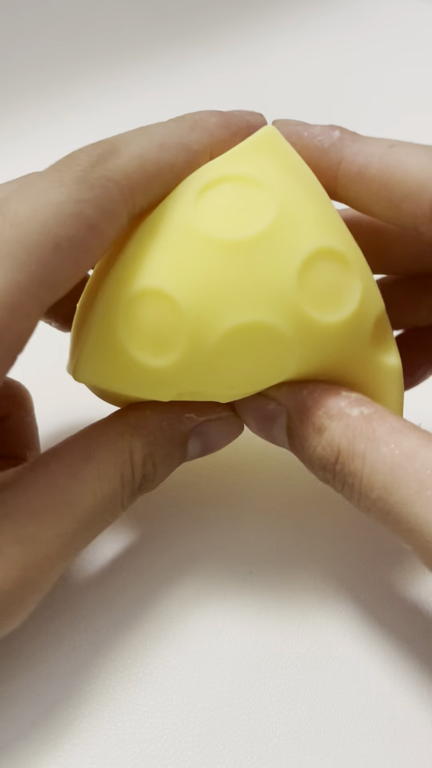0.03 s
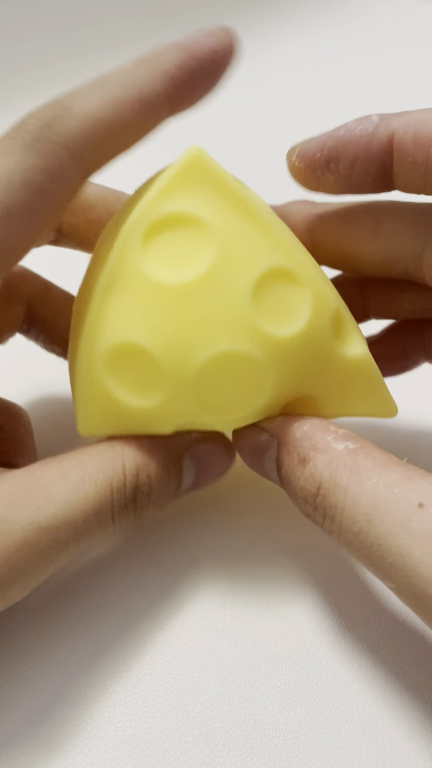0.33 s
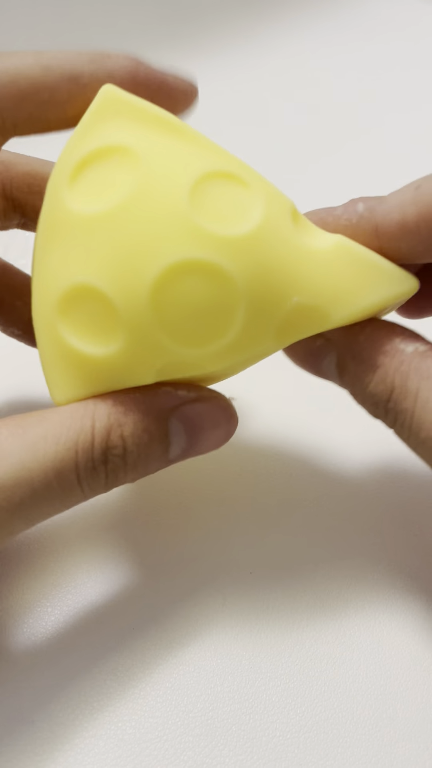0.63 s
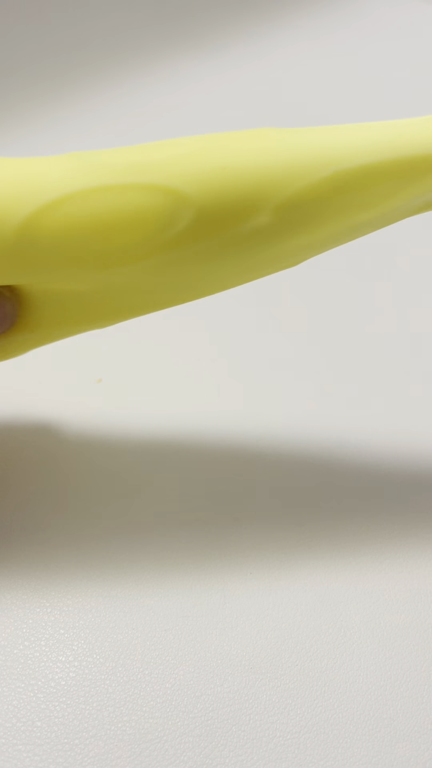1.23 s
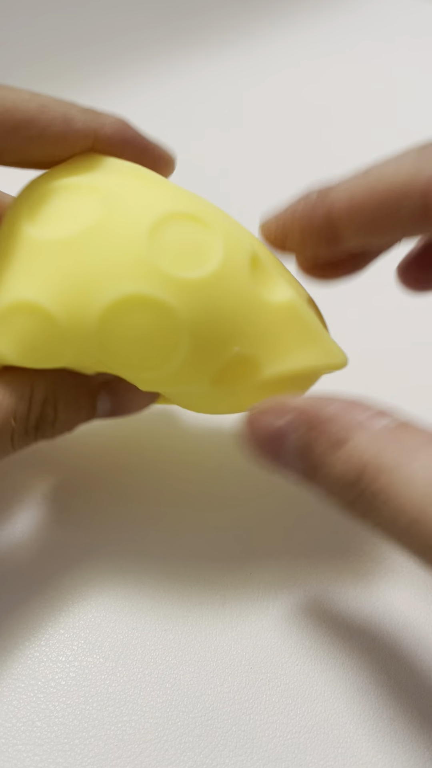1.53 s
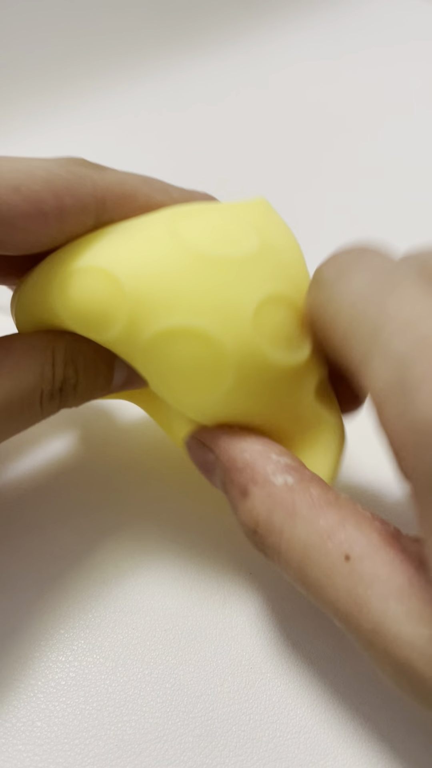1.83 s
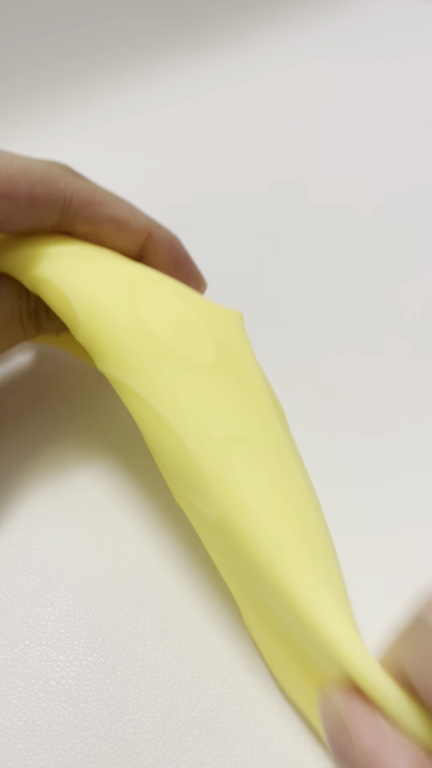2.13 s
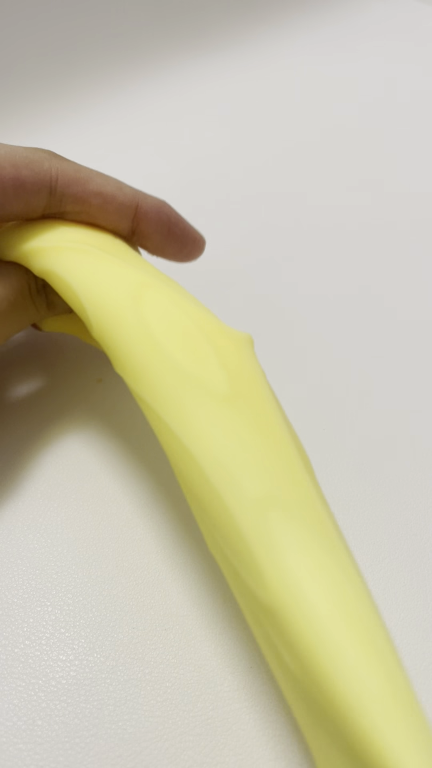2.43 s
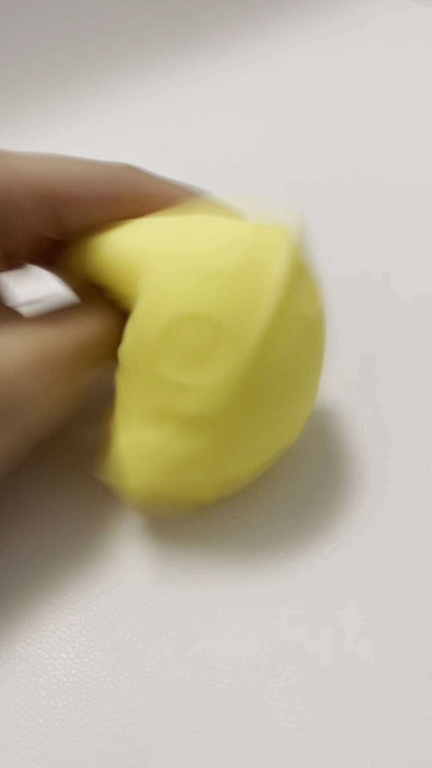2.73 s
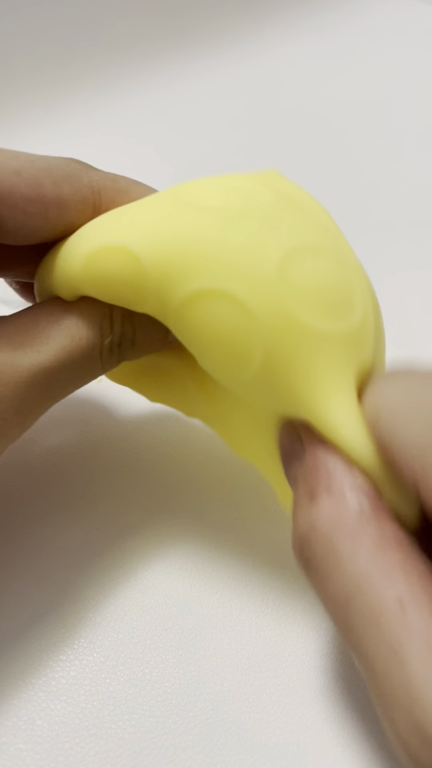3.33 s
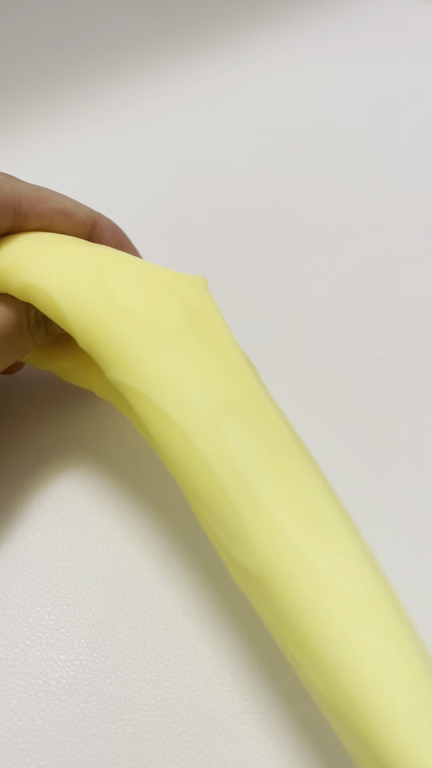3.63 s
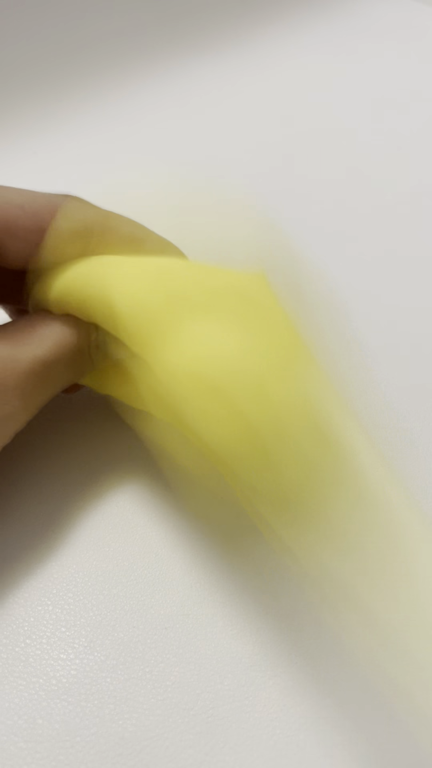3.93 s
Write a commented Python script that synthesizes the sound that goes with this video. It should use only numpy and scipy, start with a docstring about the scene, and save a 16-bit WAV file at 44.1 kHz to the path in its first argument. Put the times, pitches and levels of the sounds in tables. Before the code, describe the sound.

Close to the microphone in a small room, a stretchy rubber toy snaps back with a popping slap, once softly, then twice louder. Between releases come faint rubbing and small sticky clicks over a low fan hum.

```python
"""A soft rubber toy is squeezed, stretched and let go three times, close to a phone in a small room.
A fan hums throughout. From 0.6 s fingers rub the skin in stick-slip friction and unstick with small
ticks. Just after 1.1 s the toy is released: it slaps back, its damped mass thuds, and at 1.36 s air
caught in a fold resonates as a pop with a falling note. The rubbing and ticking go on, and two
louder releases follow, near 2.7 s and 3.9 s, each with its slaps, pop and thud."""
import sys
import numpy as np
from scipy import signal
from scipy.fft import rfft, irfft, next_fast_len
from scipy.io import wavfile
from scipy.ndimage import map_coordinates

SR = 44100
rng = np.random.default_rng(int(sys.argv[2]) if len(sys.argv) > 2 else 0)


def wav_record(signal):
    """Record a signal, one row per channel, as 16-bit PCM in the file named by sys.argv[1]."""
    frames = np.transpose(np.atleast_2d(signal))
    bounded = np.clip(frames, -1, 1)
    # unit amplitude maps onto the largest positive 16-bit level
    quanta = np.round(bounded * 32767).astype(np.int16)
    wavfile.write(sys.argv[1], SR, quanta)


N = 176400


def amp(db):
    """Amplitude ratio of a level in dB."""
    return 10 ** (np.asarray(db) / 20)


def unit(x):
    """Normalisation to rms 1."""
    return x / np.sqrt(np.mean(x ** 2) + 1e-20)


def along(points, hz):
    """Interpolation of (frequency, value) points on a logarithmic frequency axis."""
    freqs, values = np.transpose(points)
    return np.interp(np.log(hz + 1), np.log(freqs + 1), values)


def wobble(per_s):
    """Smooth random modulation: a spline through per_s Gaussian knots a second."""
    knots = rng.standard_normal(int(N * per_s / SR) + 4)
    return map_coordinates(knots, [np.arange(N) * per_s / SR])


def filtered(x, response):
    """Linear filtering: the spectrum of x times a frequency response."""
    n = x.shape[-1]
    padded = next_fast_len(n + 8192)
    return irfft(rfft(x, padded) * response(np.fft.rfftfreq(padded, 1 / SR)), padded)[..., :n]


def add(track, start, sound):
    """Superposition of a sound on a track from start [s]."""
    part = track[round(start * SR):][:len(sound)]
    part += sound[:len(part)]


def swell(t, rise, decay):
    """Envelope of a damped transient: smooth rise, then exponential decay."""
    return np.sin(np.pi / 2 * np.minimum(t / rise, 1)) ** 2 * np.exp(-np.maximum(t - rise, 0) / decay)


# left-right likeness of diffuse sound: (frequency [Hz], coherence [ratio])
COHERENCE = [(100, 1), (300, 0.94), (600, 0.38), (1000, 0.097), (1800, 0.62), (3500, 0.16), (6000, 0.58),
             (7600, 1), (9500, 0.65), (14500, .9)]
def diffuse(pair):
    """Partial coherence: two independent signals mix to be partly alike in left and right."""
    angle = lambda hz: np.arccos(np.clip(along(COHERENCE, hz), -1, 1)) / 2
    mid, side = filtered(pair, lambda hz: np.array([np.cos(angle(hz)), np.sin(angle(hz))]))
    return np.array([mid + side, mid - side])


# spectrum of the rushing air: (frequency [Hz], relative level [dB])
AIR_SPECTRUM = [(8.8, -36.5), (15, -8), (86, -1.5), (119, -8), (179, 0), (213, -7.5), (286, -13.5),
                (321, -11), (450, -14.5), (540, -11.5), (972, -27.5), (1260, -32), (3300, -44.5),
                (4840, -49), (7720, -54), (11600, -54.5), (16000, -57)]
# resonances of the housing: (centre [Hz], width [Hz], gain [dB])
HOUSING_MODES = [(1850, 110, 8.5), (3030, 70, 10), (3640, 70, 2.5)]
# motor tones: (frequency [Hz], relative level [dB])
MOTOR_TONES = [(96.9, -64.5), (172.3, -66.5), (290.7, -68), (387.6, -71), (532.9, -68), (581.4, -71.5)]
def fan(air_db=-54.5, motor_gain_db=0.5, waver_rad=0.86):
    """Broadband flow noise coloured by housing resonances, plus motor tones that waver in phase."""
    t = np.arange(N) / SR
    housing_db = lambda hz: sum(db / (1 + (2 * (hz - centre) / width) ** 2)
                                for centre, width, db in HOUSING_MODES)
    noise = diffuse(rng.standard_normal((2, N)))
    air = unit(filtered(noise, lambda hz: amp(along(AIR_SPECTRUM, hz) + housing_db(hz))))
    hum = np.zeros(N)
    for hz, db in MOTOR_TONES:
        phase = 2 * np.pi * hz * t + waver_rad * wobble(per_s=6.2)
        hum += amp(db + motor_gain_db) * np.sqrt(2) * np.sin(phase)
    return amp(air_db) * air + hum


# reverberation time: (frequency [Hz], T60 [s])
ROOM_T60 = [(100, 0.38), (650, 0.39), (2000, 0.21), (5500, 0.36), (15000, 0.34)]
# strength of the reverberation: (frequency [Hz], gain [dB])
ROOM_GAIN = [(100, -10.5), (350, -14), (700, -14), (1500, -12), (4000, -7), (9000, -15), (15000, -16)]
def room_tail(build_s=0.0016):
    """Impulse response of a small room: diffuse noise, each frequency decaying at its own rate."""
    hz, t, spectra = signal.stft(rng.standard_normal((2, SR // 2)), SR, nperseg=256)
    fade = amp(-60 * t / along(ROOM_T60, hz)[:, None]) * (1 - np.exp(-t / build_s))
    energy = np.mean(fade ** 2, axis=1, keepdims=True) * SR / 2
    fade *= amp(along(ROOM_GAIN, hz))[:, None] / np.sqrt(energy)
    return diffuse(signal.istft(spectra * fade, SR, nperseg=256)[1])


def room(x, segments=8):
    """Reverberation by convolution, with a fresh noise tail per segment so that it does not ring."""
    out, step = np.zeros((2, N)), N // segments
    for first in range(0, N, step):
        for channel, tail in zip(out, room_tail()):
            add(channel, first / SR, signal.fftconvolve(x[first:first + step], tail))
    return out


def friction(crackle_per_s=180, crackle_db=-6.5):
    """Stick-slip friction: noise surges and crackle clusters where the fingertip catches."""
    catch = wobble(per_s=45)
    hiss = rng.standard_normal(N)
    roughness_db = 2.5 * wobble(per_s=500) + wobble(per_s=12) + 3 * catch
    size_db = 5 * rng.uniform(-1, 1, N) + 3 * np.tanh(catch)
    impulses = (rng.random(N) < crackle_per_s / SR) * rng.choice([-1, 1], N)
    return unit(hiss * amp(roughness_db)) + amp(crackle_db) * unit(impulses * amp(size_db))


# spectrum of the friction: (frequency [Hz], relative level [dB])
RUB_SPECTRUM = [(300, -25), (1000, -3), (2500, -2.5), (4500, -3), (8500, -3), (12000, -5), (16000, -7)]
# finger strokes: (start [s], peak [s], end [s], peak level [dB], tilt [dB/octave])
STROKES = [(.63, 0.852, 1.09, -68, -0.5), (.86, 1.08, 1.7, -70, -2.5), (1.17, 1.22, 1.53, -61, -3.5),
           (1.31, 1.427, 1.77, -69.5, -2), (1.71, 1.743, 2.66, -78.5, -4), (1.97, 2.05, 2.26, -66.5, 2),
           (2.093, 2.17, 2.34, -68, 3), (2.17, 2.3, 2.54, -62.5, -0.5), (2.687, 2.698, 2.706, -47, -3.5),
           (2.76, 2.846, 2.93, -67.5, -2), (3.04, 3.084, 3.2, -73.5, .5), (3.3, 3.413, 3.7, -83.5, -4),
           (3.59, 3.62, 4.2, -74.5, -8.5), (3.89, 3.927, 3.97, -47, -8)]
def rubs(pivot_hz=5000):
    """Friction noise of fingers on the stretched skin, amplitude-modulated by each stroke."""
    out, grains = np.zeros(N), friction()
    octaves = lambda hz: np.log2(np.maximum(hz, RUB_SPECTRUM[0][0]) / pivot_hz)
    for start, peak, end, db, tilt in STROKES:
        first, last = round(start * SR), min(round(end * SR), N)
        t = np.arange(first, last) / SR
        colour = lambda hz: amp(along(RUB_SPECTRUM, hz) + tilt * octaves(hz))
        envelope = np.interp(t, [start, peak, end], [0, 1, 0]) ** 1.8
        add(out, first / SR, amp(db) * envelope * unit(filtered(grains[first:last], colour)))
    return out


CREEP_S = 0.012  # the skin creeps this long before it lets go
# the knock, snap, crack and fizz bands of a slip: (lower edge [Hz], upper edge [Hz])
SLIP_BANDS = [(450, 884), (1150, 2730), (3300, 7360), (7500, 14800)]
def burst(rise, decay, levels_db, creep_db=-16, growth_s=0.0025, span_s=0.0067):
    """Stick-slip release: creep, then a volley of micro-slips; band levels are rms referred to span_s."""
    t = np.arange(SR // 10) / SR - CREEP_S
    creep = amp(creep_db) * np.exp(-np.abs(t) / growth_s)
    scatter = np.exp(0.37 * rng.standard_normal(len(t)))
    slips = (creep + swell(np.maximum(t, 0), rise, decay)) * scatter
    out = np.zeros(len(t))
    for edges, db in zip(SLIP_BANDS, levels_db):
        bandpass = signal.butter(3, edges, 'band', fs=SR, output='sos')
        band = signal.sosfilt(bandpass, slips * rng.standard_normal(len(t)))
        out += amp(db) * band * np.sqrt(span_s * SR) / np.linalg.norm(band)
    return out


# the skin unsticking: (time [s], knock [dB], snap [dB], crack [dB], fizz [dB], decay constant [s])
UNSTICKINGS = [(0.724, -53, -64, -93, -94, 0.00061), (0.8223, -47, -55, -79, -80, 0.00035),
               (1.062, -56, -53, -52.5, -65.5, 0.0029), (1.094, -63, -66, -60, -80, 0.0031),
               (1.132, -50, -53.5, -62, -77, 0.0094), (1.29, -57.5, -61.5, -81, -83, 0.0032),
               (1.438, -49.5, -47, -57.5, -83, 0.0066), (1.481, -74, -73, -63, -63, 0.0014),
               (1.513, -80, -73, -64, -70, 0.0029), (1.72, -72, -97, -49.5, -49.5, 0.0012),
               (1.874, -48.5, -61, -78, -92, 0.0015), (1.887, -61, -60, -57.5, -68, 0.0021),
               (2.0692, -60, -72, -64, -53.5, 0.0012), (2.124, -42.5, -42.5, -42.5, -51.5, 0.0015),
               (2.16, -61, -81.5, -62, -56, 0.001), (2.243, -63, -68, -79, -56, 0.0011),
               (2.322, -58.5, -59, -46, -48, 0.00079), (2.4754, -71, -59, -62, -79, 0.002),
               (2.676, -70, -75, -71, -64, 0.0012), (2.844, -61, -57.5, -65, -76, 0.0059),
               (3.032, -66, -54, -64.5, -95.5, 0.0016), (3.242, -54, -85, -96, -99, 0.0023),
               (3.271, -78, -87, -74.5, -88, 0.0015), (3.612, -75, -72, -73, -99, 0.003)]
def ticks(rise_s=0.00078):
    """Failure of adhesion: tacky rubber lets go of a fingertip in a short broadband burst."""
    out = np.zeros(N)
    for time, *levels_db, decay in UNSTICKINGS:
        add(out, time - CREEP_S, burst(rise_s, decay, levels_db))
    return out


# rubber striking rubber and fingers, levels before the band gains:
# (time [s], rise [s], decay constant [s], knock [dB], snap [dB], crack [dB], fizz [dB])
IMPACTS = [(1.1466, 0.0014, 0.0061, -46, -47, -43, -60.5),
           (1.1503, 0.00083, 0.0033, -41.5, -31.5, -33.5, -40),
           (1.159, 0.0034, 0.0047, -39.5, -33, -39.5, -42), (1.1645, 0.001, 0.0035, -38, -38.5, -39, -51),
           (1.176, .001, 0.0076, -45, -45, -46, -45), (1.3575, 0.0057, .011, -35.5, -39.5, -40.5, -46.5),
           (1.381, 0.0022, 0.0037, -51, -52.5, -51.5, -65), (2.6889, .0004, 0.00068, -49, -58, -55, -38.5),
           (2.7073, 0.0028, 0.0029, -43, -43, -39, -41), (2.7159, 0.0004, 0.0015, -23, -34.5, -45, -51),
           (2.7271, .0016, 0.0029, -31, -39, -37.5, -42), (3.9362, 0.00018, 0.00048, -23, -41, -33, -27),
           (3.9412, 0.00047, 0.0015, -24, -22, -30.5, -42),
           (3.952, 0.001, 0.0011, -26.5, -35.5, -36.5, -43)]
def slaps(band_gains_db=(-2.5, -3.5, -2, -1.5)):
    """Elastic recoil: the released end slips free, hits the body and rebounds."""
    out = np.zeros(N)
    for time, rise, decay, *levels_db in IMPACTS:
        add(out, time - CREEP_S, burst(rise, decay, np.add(levels_db, band_gains_db)))
    return out


# modes of the soft mass: (frequency [Hz], relative level [dB], T60 [s])
MASS_MODES = [(46.1, -10.5, 0.067), (74, -1, 0.091), (115.4, -0.5, .08), (255, -0.5, 0.044),
              (305.3, 2.5, 0.03)]
# landings; a glancing blow barely moves the slow modes: (time [s], level [dB], tilt [dB/octave])
LANDINGS = [(1.162, -41.5, 3), (1.373, -44, -1.5), (2.713, -31, 0), (2.735, -37.5, -3.5), (3.939, -29, 0.5)]
def thuds(pivot_hz=150, rise_cycles=1.26, detune=0.042):
    """Heavily damped modal vibration: the mass wobbles on landing, its slowest modes building up last."""
    out, t = np.zeros(N), np.arange(SR // 3) / SR
    for time, db, tilt in LANDINGS:
        for hz, mode_db, t60 in MASS_MODES:
            gain = amp(db + mode_db + tilt * np.log2(hz / pivot_hz))
            envelope = swell(t, rise_cycles / hz, t60 / np.log(1000))
            add(out, time, gain * envelope * np.sin(2 * np.pi * hz * rng.normal(1, detune) * t))
    return out


# side resonances of a fold: (frequency over the main note [ratio], relative level [dB])
SIDE_MODES = [(2.14, -17), (1.7, -23.5), (1.38, -16.5), (0.807, -15)]
# air popping out of a fold:
# (time [s], level [dB], first pitch [Hz], final pitch [Hz], rise [s], decay constant [s], side gain [dB])
AIR_POCKETS = [(1.361, -30, 710, 614, 0.0033, 0.0078, -0.5), (2.6895, -32.5, 783, 814, 0.0016, 0.011, -6.5),
               (2.7105, -26, 877, 758, 0.00046, 0.0078, -3.5),
               (2.7168, -8.5, 687, 582, 0.0019, 0.0051, -7.5), (2.7275, -26, 753, 673, 0.0026, 0.005, 0),
               (3.9378, -3.5, 910, 553, 0.005, 0.0049, 3)]
def pops(glide_s=0.00825):
    """Cavity resonance: trapped air rings briefly, its pitch gliding, mostly down, as the fold opens."""
    out, t = np.zeros(N), np.arange(SR // 10) / SR
    for time, db, first_hz, final_hz, rise, decay, side_db in AIR_POCKETS:
        pitch = final_hz + (first_hz - final_hz) * np.exp(-t / glide_s)
        phase = 2 * np.pi * np.cumsum(pitch) / SR
        sides = sum(amp(mode_db + side_db) * np.sin(ratio * phase) for ratio, mode_db in SIDE_MODES)
        add(out, time, amp(db) * swell(t, rise, decay) * (np.sin(phase) + sides))
    return out


def scene(passes=3):
    """Superposition of direct sound, fan and several reverberation passes, each with fresh slip noise."""
    body = pops() + thuds() + rubs()
    reverberation = sum(room(ticks() + slaps() + body) for _ in range(passes)) / np.sqrt(passes)
    return body + ticks() + slaps() + reverberation + fan()


# phase difference between the channels: (frequency [Hz], lead of the left [rad])
STEREO_PHASE = [(0, 0), (500, -.2), (1100, -.8), (2000, 0), (3200, .8), (4900, 0), (7600, 3.14), (10500, 6),
                (11700, 6.4), (14300, 9.4), (16500, 11)]
# level difference between the channels: (frequency [Hz], left minus right [dB])
STEREO_BALANCE = [(60, 0.5), (380, 0), (700, 1.2), (1300, 0.5), (2400, 0), (5000, 0.5)]
def record(dry, top_hz=16700, rolloff_hz=700):
    """Stereo widening by fixed, frequency-dependent phase and level differences; the top treble is cut."""
    def response(hz):
        lead = np.interp(hz, *np.transpose(STEREO_PHASE))
        balance_db = along(STEREO_BALANCE, hz)
        lowpass = np.clip((top_hz - hz) / rolloff_hz + 0.5, 0, 1) ** 2
        share = np.array([[0.5], [-0.5]])  # left, right
        return np.exp(1j * share * lead) * amp(share * balance_db) * lowpass
    return filtered(dry, response)


dry = scene()
out = record(dry)
wav_record(out)
```